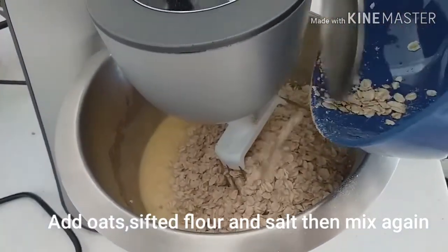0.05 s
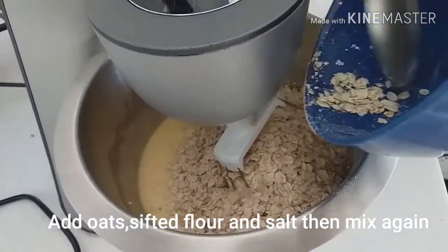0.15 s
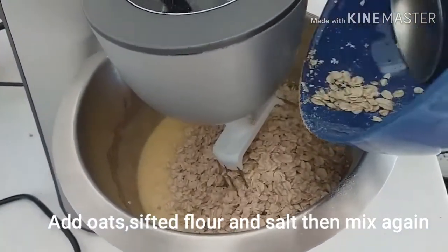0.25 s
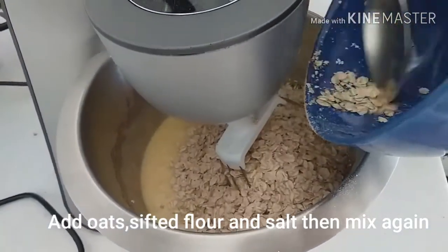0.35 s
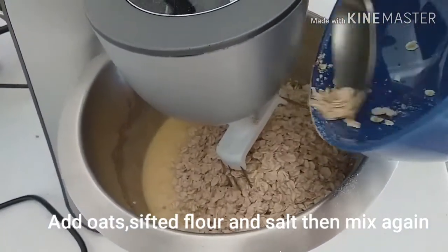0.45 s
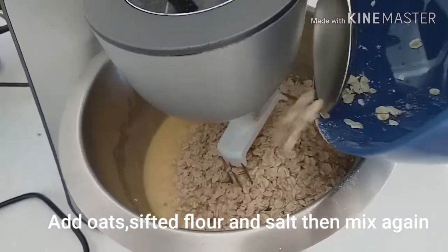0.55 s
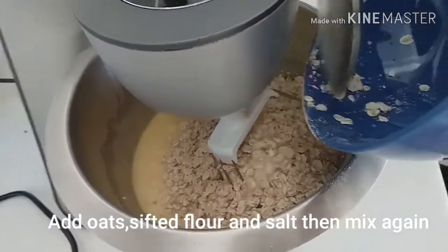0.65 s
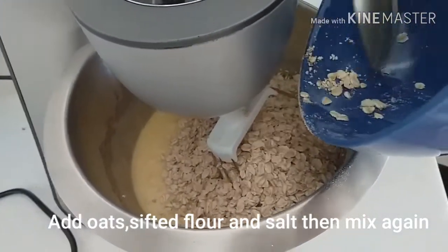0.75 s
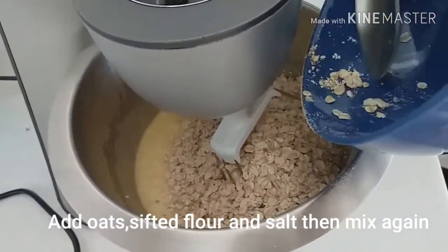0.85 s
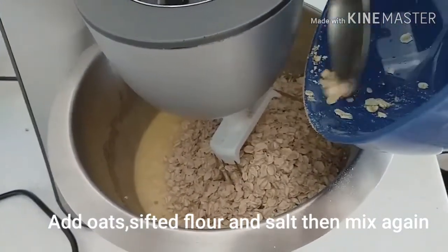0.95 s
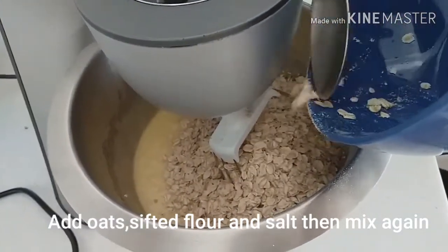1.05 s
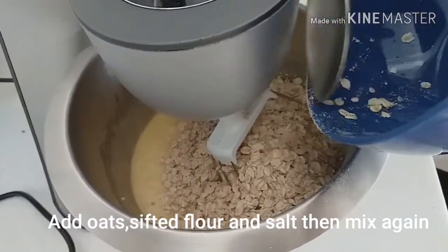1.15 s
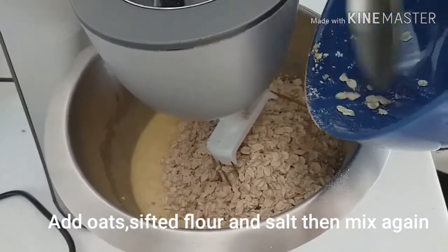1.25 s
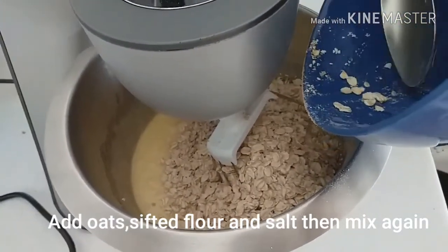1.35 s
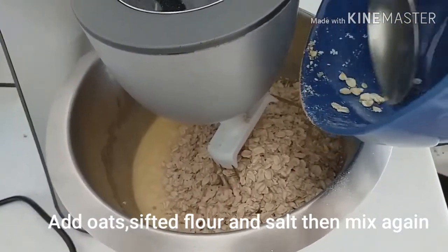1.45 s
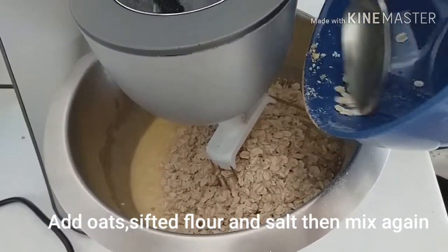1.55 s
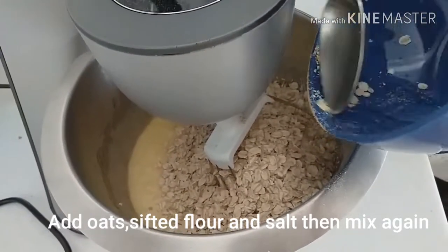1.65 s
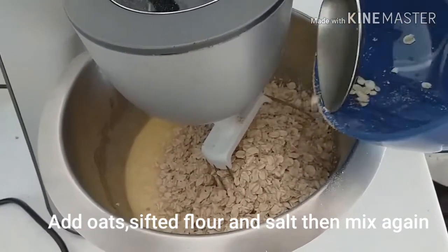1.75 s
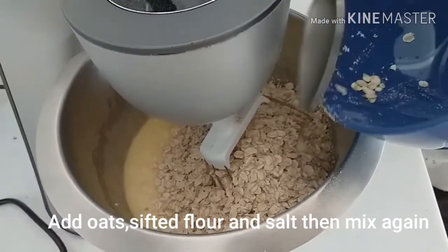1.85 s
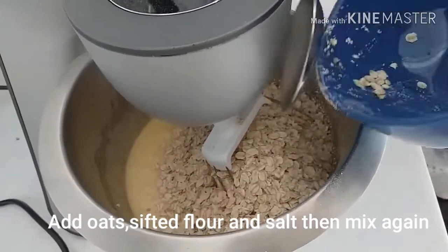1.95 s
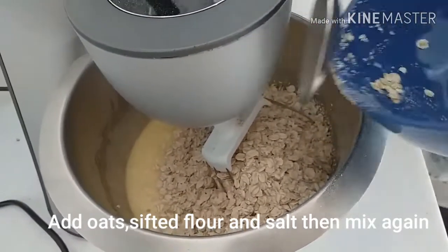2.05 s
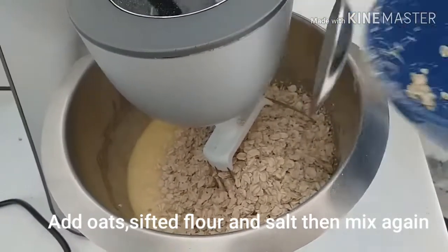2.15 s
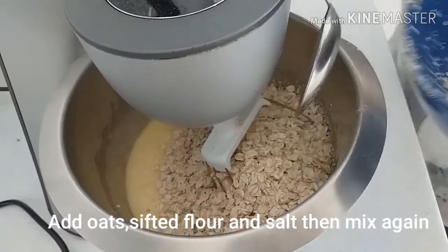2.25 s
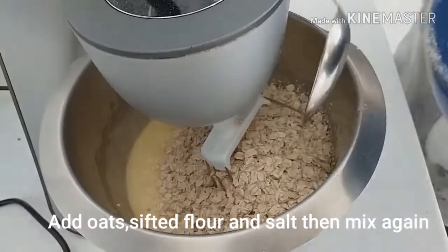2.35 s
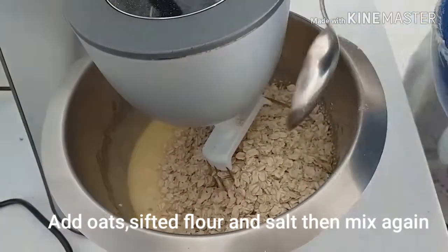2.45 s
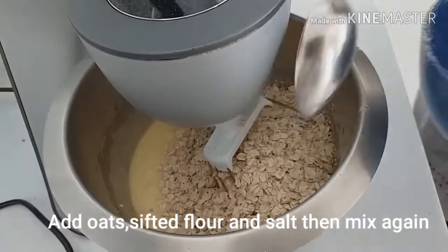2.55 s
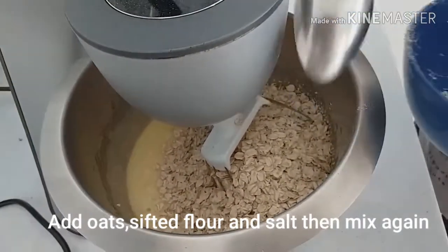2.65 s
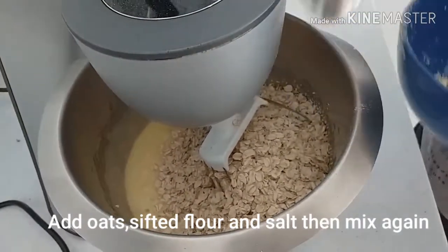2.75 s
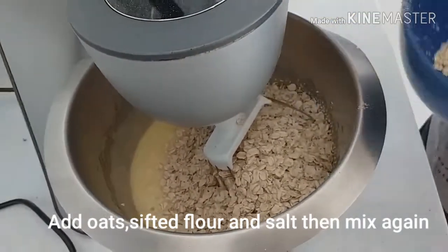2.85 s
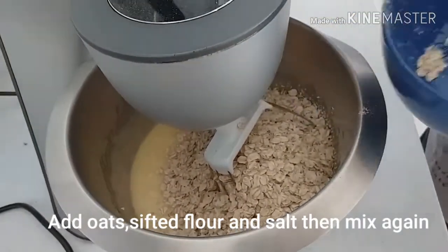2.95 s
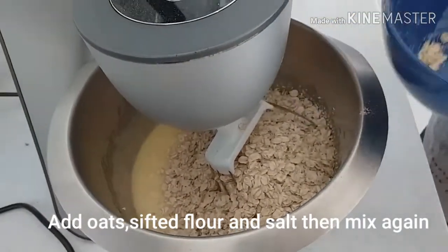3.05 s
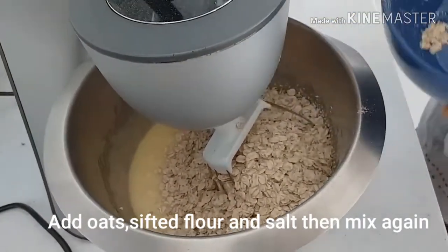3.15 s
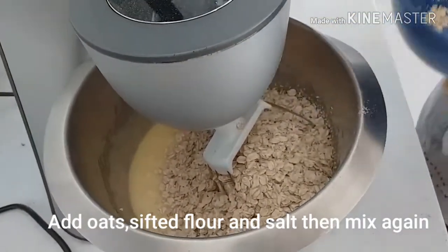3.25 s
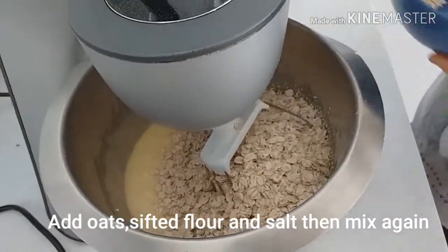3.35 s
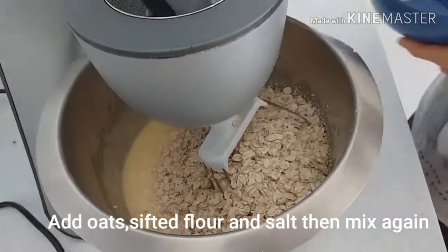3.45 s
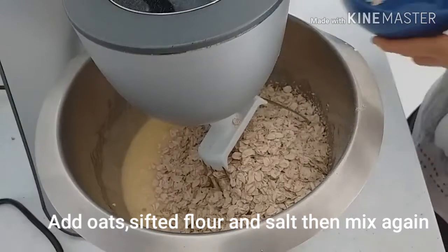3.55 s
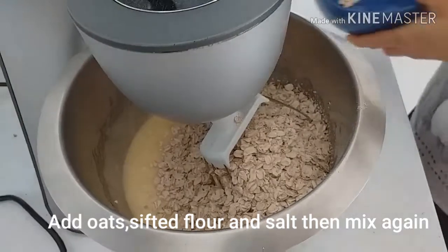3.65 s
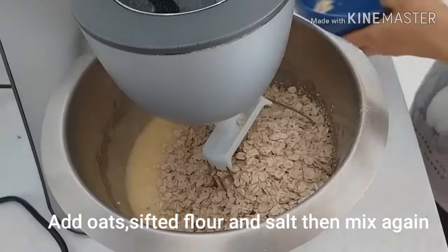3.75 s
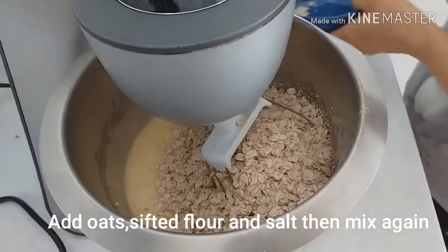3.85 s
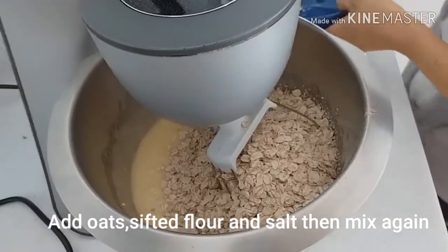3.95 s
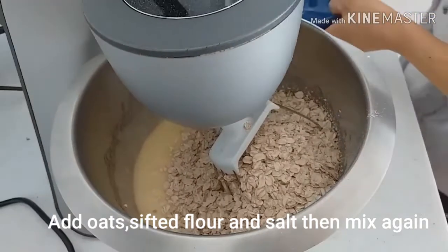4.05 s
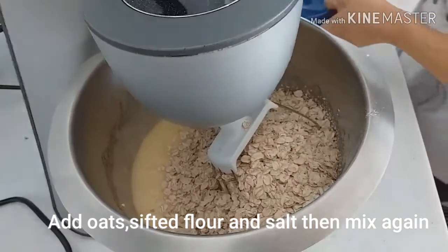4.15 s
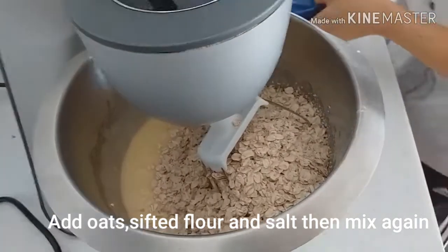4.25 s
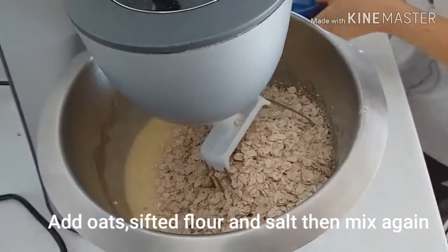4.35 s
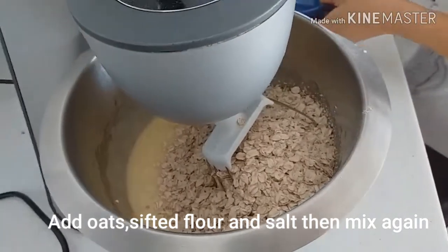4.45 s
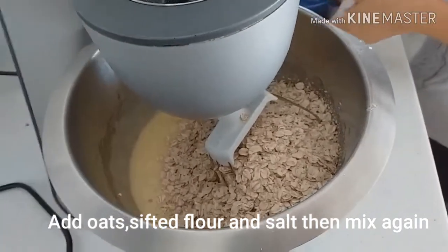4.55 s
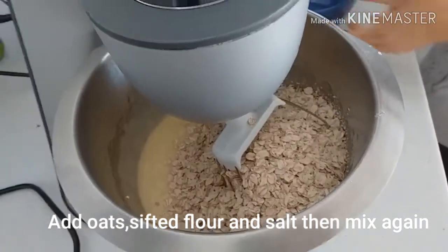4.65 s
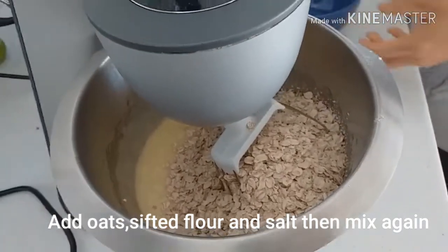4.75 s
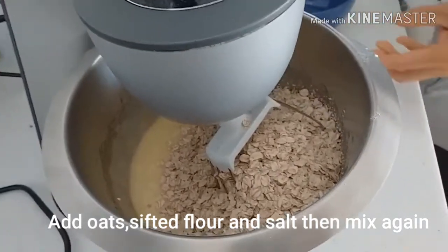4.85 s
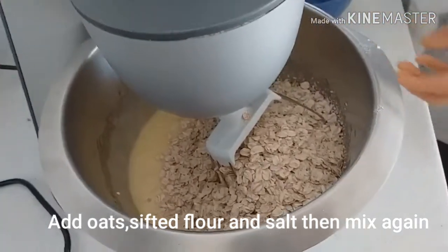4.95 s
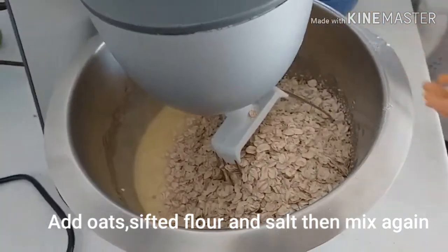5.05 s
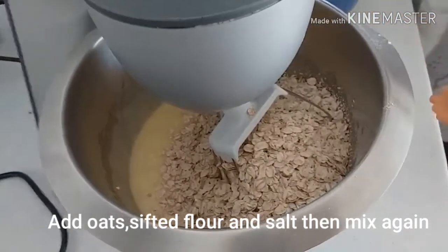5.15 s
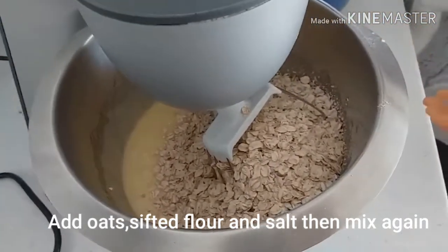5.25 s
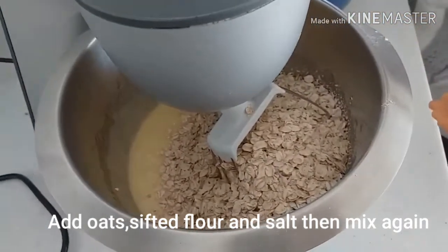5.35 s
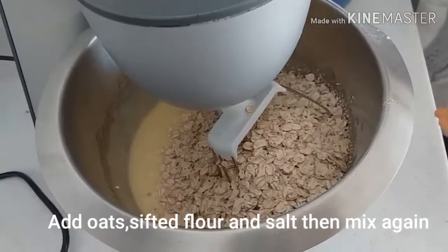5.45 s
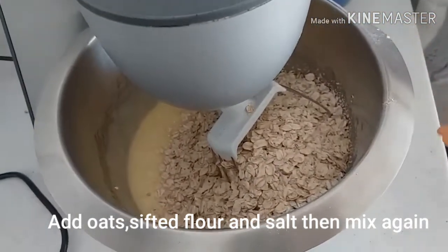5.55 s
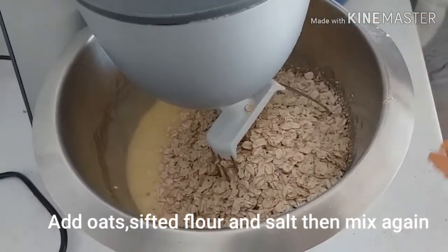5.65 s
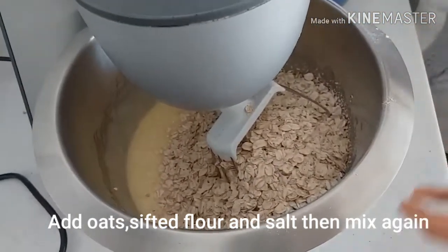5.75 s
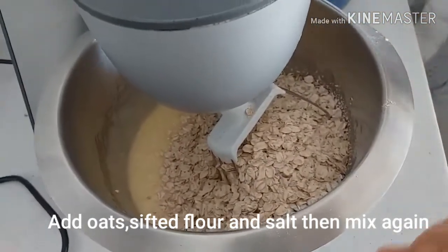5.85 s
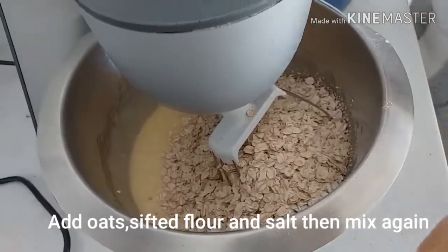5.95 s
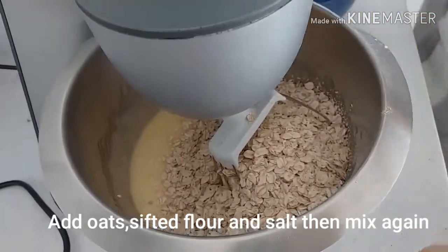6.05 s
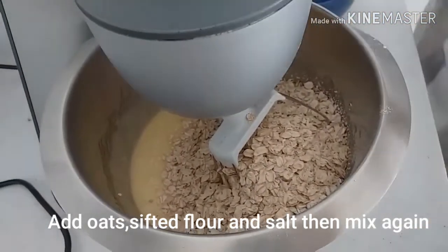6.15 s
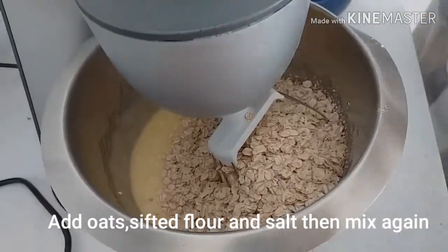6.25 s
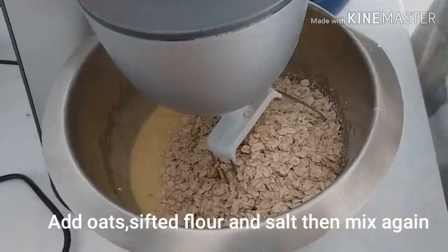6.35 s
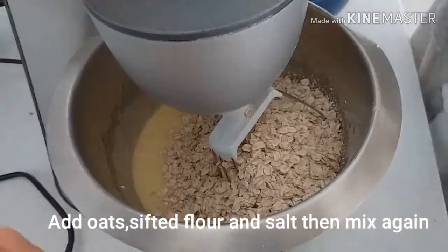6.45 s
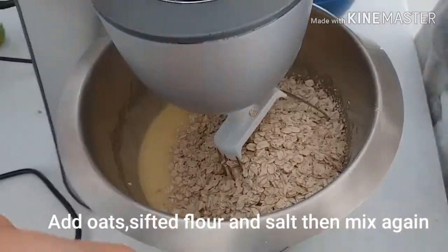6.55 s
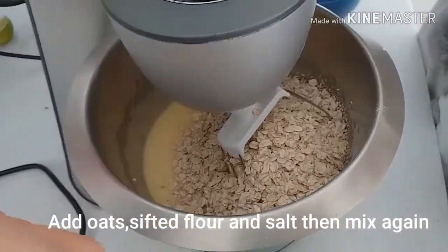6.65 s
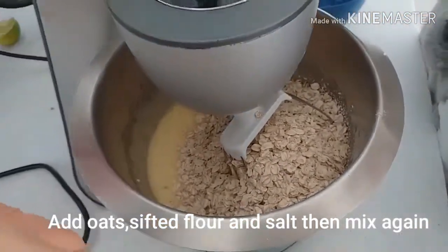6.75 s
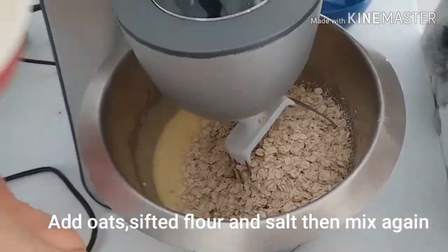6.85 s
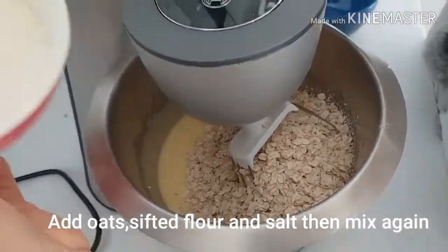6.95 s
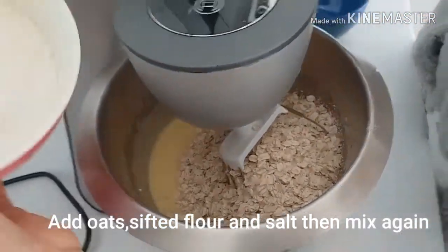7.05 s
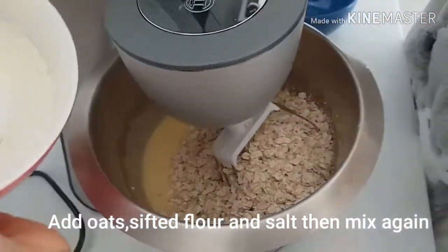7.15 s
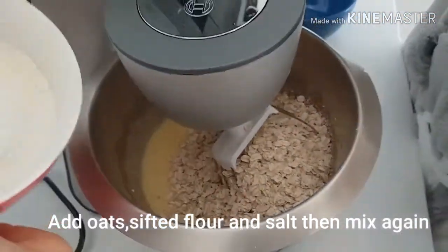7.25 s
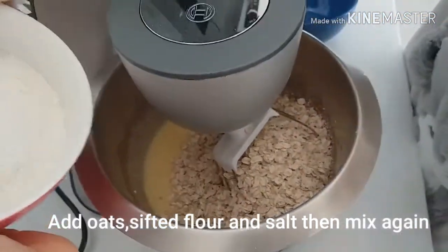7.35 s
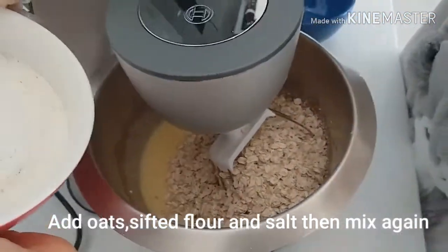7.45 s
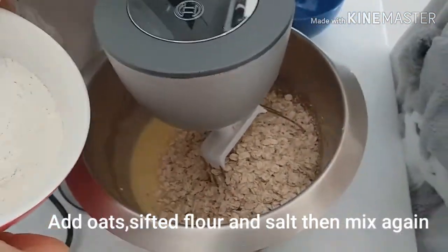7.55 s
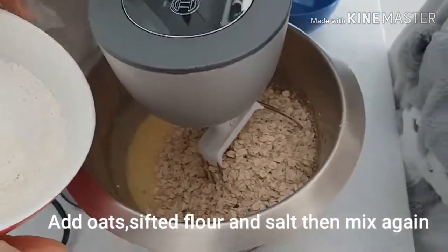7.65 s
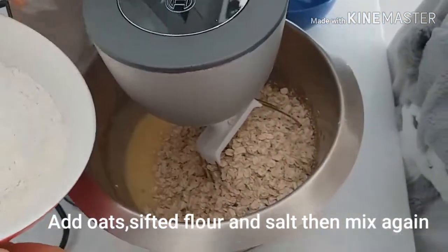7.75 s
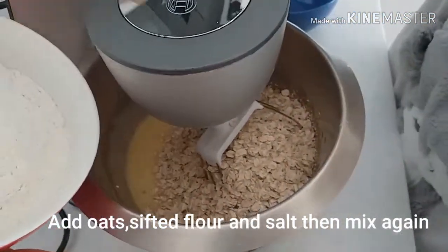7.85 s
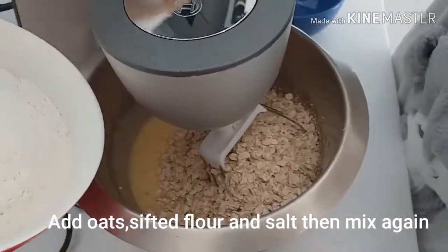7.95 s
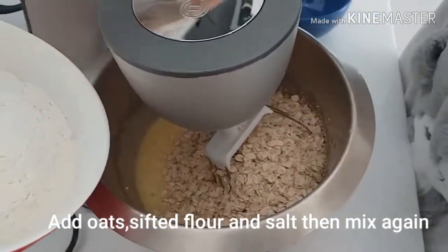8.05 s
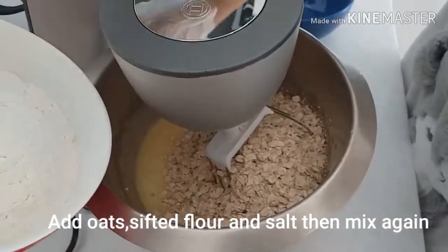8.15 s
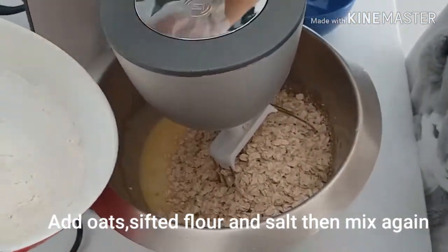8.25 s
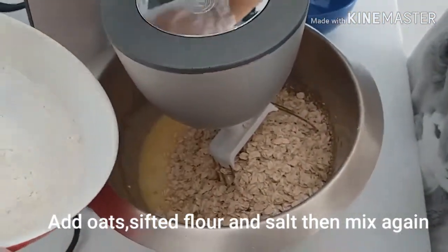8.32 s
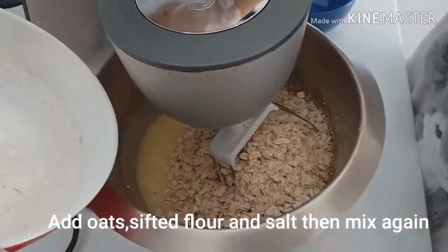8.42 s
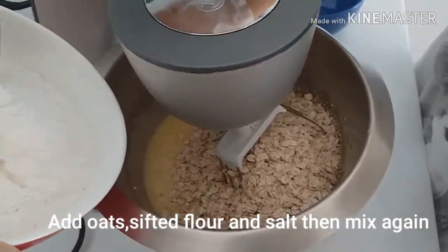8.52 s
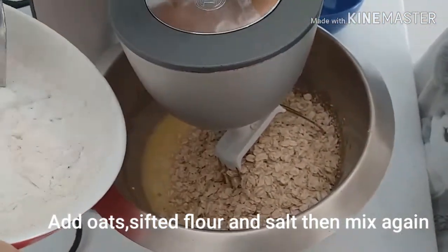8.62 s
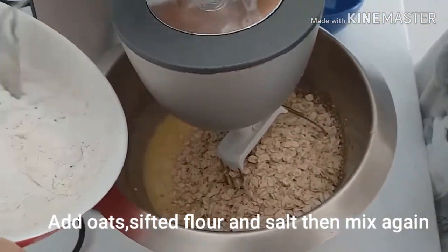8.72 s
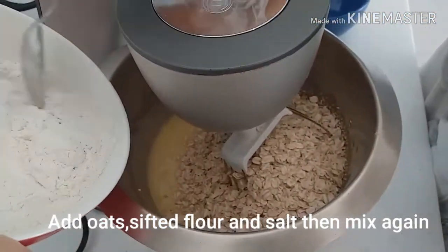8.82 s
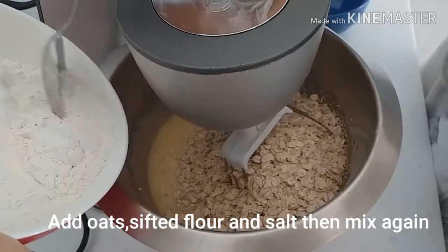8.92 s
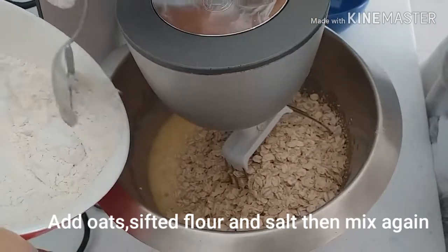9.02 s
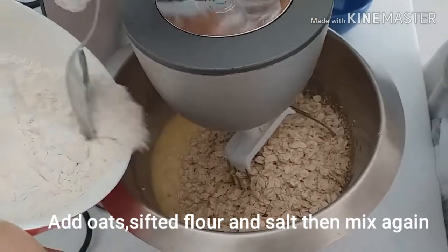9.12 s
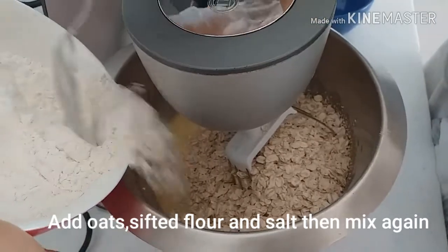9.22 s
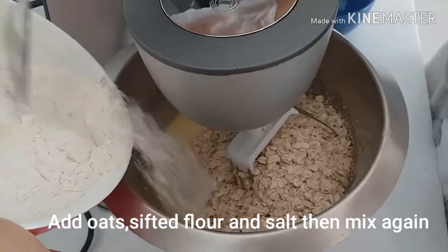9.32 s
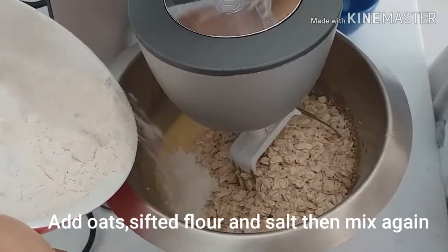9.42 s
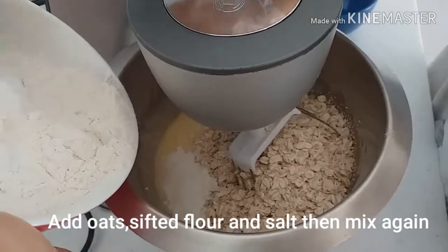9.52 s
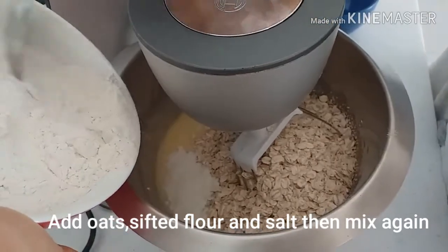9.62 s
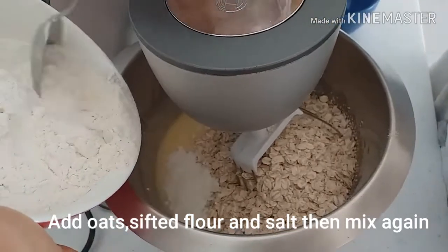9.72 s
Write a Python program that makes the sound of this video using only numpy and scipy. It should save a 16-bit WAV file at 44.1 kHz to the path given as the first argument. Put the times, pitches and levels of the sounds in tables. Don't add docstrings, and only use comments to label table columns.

```python
import sys
import numpy as np
from scipy import signal
from scipy.fft import rfft, irfft, next_fast_len
from scipy.io import wavfile
from scipy.ndimage import uniform_filter1d, map_coordinates

SR = 44100
rng = np.random.default_rng(int(sys.argv[2]) if len(sys.argv) > 2 else 0)


def store_wav(level_fs):
    pcm = np.round(np.clip(np.atleast_2d(level_fs), -1, 1) * 32767)
    wavfile.write(sys.argv[1], SR, pcm.T.astype(np.int16))


def volts_from_db(level):
    exponent = np.asarray(level, float) / 20
    return 10 ** exponent


N = 431298

# start_s, steel_peak_db, brightness_db, steel_hz, freedom_to_ring [ratio]
SPOON_TAPS = [(0.2504, -17.5, -6.5, 1900, 1.1), (0.55, -44.5, -20, 1200, 1.1),
              (0.8059, -42, -4.5, 826, 0.72), (1.0082, -38.5, -12, 3380, 0.56),
              (1.0298, -16, -31.5, 1900, 0.6), (1.438, -34.5, -7, 1880, 0.67), (1.4451, -47, 4, 1880, 0.59),
              (1.668, -33.5, -28, 1200, 0.48), (1.7927, -29.5, -7.5, 1900, 1.2),
              (1.9448, -35, -9, 1180, 0.7), (2.0861, -31, -6.5, 3300, 1.2), (2.7192, -45, -28, 4350, 0.67)]
# freq_hz, level_db, t60_s
STAND_MODES = [(72, -7.5, 0.16), (116.6, 4, 0.11), (192, -1.5, 0.078), (290, 3.5, 0.04)]


def unit(x):
    return x / np.sqrt(np.mean(x ** 2) + 1e-20)


def along(points, hz):
    f, v = np.transpose(points)
    return np.interp(np.log(hz + 1), np.log(f + 1), v)


def wobble(rate_hz):
    knots = rng.standard_normal(int(N * rate_hz / SR) + 4)
    return map_coordinates(knots, [np.arange(N) * rate_hz / SR])


def coloured(x, spectrum):
    m = next_fast_len(N + 8192)
    gain = volts_from_db(along(spectrum, np.fft.rfftfreq(m, 1 / SR)))
    return unit(irfft(rfft(x, m) * gain, m)[:N])


def above(x, hz):
    return signal.sosfilt(signal.butter(3, hz, "high", fs=SR, output="sos"), x)


def patchy(x, depth_db):
    z = signal.stft(x, nperseg=256)[2]
    field = uniform_filter1d(rng.standard_normal(z.shape), 6, 0)
    field = uniform_filter1d(field, 24, 1)
    return signal.istft(z * volts_from_db(depth_db * unit(field)), nperseg=256)[1][:N]


def crackle(density_hz, spread_db, share):
    size = volts_from_db(spread_db * np.minimum(rng.exponential(size=N), 3))
    decay = volts_from_db(-60 * np.arange(SR // 100) / SR / .005)
    creases = signal.fftconvolve((rng.random(N) < density_hz / SR) * size, decay)[:N]
    bursts = unit(creases * volts_from_db(2 * wobble(50)) * rng.standard_normal(N))
    return np.sqrt(share) * bursts + np.sqrt(1 - share) * rng.standard_normal(N)


def swells(rows, shape=1.4):
    t = np.arange(0, N / SR + .002, .002)
    s, db, rise, fall = np.transpose(rows)[:, :, None]
    lost_db = 10 * np.maximum((s - t) / rise, (t - s) / fall) ** shape
    power = volts_from_db(2 * (db - np.minimum(lost_db, 70))).sum(0)
    return np.interp(np.arange(N) / SR, t, 10 * np.log10(power))


def ring(modes, chatter_s, focus_hz=1000, fall_db=0, top_db=0, size=SR // 3):
    hz, db, t60 = np.transpose(modes)[:, :, None]
    t = np.arange(size) / SR
    db = db - fall_db * np.abs(np.log2(hz / focus_hz)) + top_db * (hz > 4000)
    brief = t[:SR // 25]
    contact = rng.standard_normal(len(brief)) * volts_from_db(-60 * brief / chatter_s) * (1 - np.exp(-brief / 0.00022))
    push = np.abs(np.exp(-2j * np.pi * hz * brief) @ contact)[:, None]
    share = push / np.linalg.norm(contact) + .2
    swing = volts_from_db(db - 60 * t / t60) * (1 - np.exp(-t * hz)) * np.sin(2 * np.pi * hz * t)
    x = signal.fftconvolve(contact, (swing / share).sum(0))[:len(t)]
    return x / np.sqrt(6 * uniform_filter1d(x * x, SR // 200).max())


def crack(t60_s):
    return volts_from_db(-60 * np.arange(SR // 3) / SR / t60_s) * rng.standard_normal(SR // 3) / 2


def kitchen():
    # freq_hz, t60_s
    room_t60 = [(100, 0.72), (400, 0.72), (1200, 0.78), (3000, 0.53), (8000, 0.4), (16000, 0.17)]
    hz, t, z = signal.stft(rng.standard_normal(2 * SR // 3), SR, nperseg=256)
    tail = signal.istft(z * volts_from_db(-60 * t / along(room_t60, hz)[:, None]), SR, nperseg=256)[1]
    return np.pad(tail / np.linalg.norm(tail), (round(.005 * SR), 0))


def add(track, start_s, blow, wet_db):
    heard = volts_from_db(wet_db) * signal.fftconvolve(blow, kitchen())
    heard[:len(blow)] += blow
    heard = heard[max(0, -round(start_s * SR)):]
    part = track[max(0, round(start_s * SR)):][:len(heard)]
    part += heard[:len(part)]


def house():
    # time_s, level_db
    air_levels = [(0, -69), (.77, -64), (1.48, -68), (2.15, -63.5), (2.61, -61), (3.3, -67), (4.5, -64.5),
                  (4.98, -57.5), (5.43, -69.5), (6.42, -63.5), (6.7, -68.5), (7.55, -64.5), (7.85, -59.5),
                  (8.7, -67.5), (9.78, -64.5)]
    # freq_hz, level_db_per_hz
    rumble_spectrum = [(12, -70), (20, -35.5), (70, -7), (90, -1.5), (109, 2), (125, -6), (202, -2.5),
                       (305, -4), (394, -10), (694, -17.5), (837, -23.5), (1050, -16.5), (1200, -26),
                       (1560, -30), (2640, -120)]
    # freq_hz, level_db_per_hz
    hiss_spectrum = [(350, -42), (600, -29), (1070, 5), (1730, -3), (2570, -15.5), (4980, -4.5), (8160, -6),
                     (9240, -10.5), (14900, -9), (16000, 0)]
    s, db = np.transpose(air_levels)
    level_db = np.interp(np.arange(N) / SR, s, db) + 2.5 + 0.4 * wobble(2.8)
    rumble = volts_from_db(level_db) * coloured(rng.standard_normal(N), rumble_spectrum)
    return rumble + volts_from_db(-74) * coloured(rng.standard_normal(N), hiss_spectrum)


def slides():
    # peak_s, level_db, rise_s, fall_s, pitch_hz
    strokes = [(1.47, -60, 0.076, 0.061, 720), (1.6, -64, 0.053, 0.063, 1000),
               (1.72, -59, 0.034, 0.045, 570), (3.78, -54, 0.07, .12, 12700), (3.95, -49, 0.13, .12, 13200),
               (4.12, -46, 0.1, 0.14, 13900), (5.0, -51, 0.065, 0.078, 338), (6.3, -70.5, 0.25, 0.26, 1620),
               (6.33, -61.5, 0.086, 0.24, 4760), (6.84, -69.5, 0.11, 0.2, 710),
               (7.15, -61, 0.096, 0.061, 288)]
    out = np.zeros(N)
    grit = crackle(density_hz=480, spread_db=3.0, share=.3)
    for *stroke, hz in strokes:
        near = slice(round((stroke[0] - .5) * SR), round((stroke[0] + .5) * SR))
        off_hz = min(hz * 0.22, 901)
        band = signal.butter(2, [hz - off_hz, hz + off_hz], "band", fs=SR, output="sos")
        out[near] += volts_from_db(swells([stroke])[near]) * unit(signal.sosfilt(band, grit[near]))
    return out


def thumps():
    # start_s, peak_db, rattle_db
    mixer_knocks = [(4.601, -37, -20), (7.763, -31.5, -2), (8.89, -36.5, -5), (9.118, -43.5, -8.5),
                    (9.531, -35, 3)]
    # freq_hz, level_db, t60_s
    mixer_modes = [(600, -3, 0.044), (1140, -10, 0.076), (1310, -3.5, .06), (1500, -11, 0.067),
                   (1900, -5, 0.17), (2700, 2, 0.027), (3650, 5, 0.022), (5000, -5, 0.0302)]
    out = np.zeros(N)
    for s, db, rattle_db in mixer_knocks:
        blow = ring(STAND_MODES, chatter_s=0.016) + volts_from_db(rattle_db) * ring(mixer_modes, chatter_s=0.0072)
        add(out, s, volts_from_db(db) * blow, wet_db=-7.5)
    return out


def clinks():
    # start_s, peak_db, chatter_s, click_db, room_db
    hits = [
        (4.599, -11.5, 0.029, -11.5, -6),
        (4.9446, -15, 0.013, -44, -6),
        (7.598, -21.5, 0.014, -5, -9.5),
        (8.885, -25, 0.043, -16, -17),
        (9.5227, -20, 0.0051, -8, -10),
    ]
    # freq_hz, level_db, t60_s
    cup_and_saucer = [(1164, -9.5, 0.064), (1378, -5, 0.041), (1304, -3.5, 0.029), (2320, -17, 0.047),
                      (2643, -41, 0.38), (2636, -24, 0.72), (2310, -25, 0.27), (3120, -32, .04), (3700, -6, 0.042),
                      (4110, -18, 0.0497), (720, -12.5, 0.029),
                      (4430, -6, .07), (4640, 3, .04), (4790, 2, .04), (4710, -3, .22), (4900, -5, .08),
              (5152, -5, .09), (5300, -7, .06), (5453, -4, .07), (5981, -4, .09), (7240, -14, .05),
              (8500, -1, .017), (9720, -9, .05), (10130, 3, .045), (11300, -7.5, .039)]
    glass = [(540, 4, .012), (680, -6.5, .014), (1140, -8.5, .035), (1560, -2, .03), (2060, -13, .038),
             (3435, 3, .07), (3576, 4.5, .07), (3521, -15, .3), (3470, -13, .15), (4700, -10, .025),
             (5970, -11, .07)]
    dish = [(1290, -7, 0.0087), (1700, 0, 0.0077), (2750, -21, 0.04), (3530, -0.5, 0.0072),
            (4580, -14, 0.025), (5250, -8, 0.023), (6600, -13, 0.012), (8000, -17, 0.023),
            (9580, -17, 0.059)]
    rim = [(1900, -28, 0.012), (3760, 2, 0.014), (4676, 0.5, 0.023), (5460, 6, 0.011), (5970, 7, 0.0063),
           (7220, 4, 0.0062), (8500, -2, 0.0059), (10500, -4, .01)]
    basin = [(1098, -8, .6), (1140, -11, .5), (1172, -2, .07), (577, -10, .03), (1500, -8, .12),
             (2300, 1, .012), (2649, -13, .5), (2590, -6, .04), (3520, -3, .01), (4020, -3, .014),
             (4662, -9, .4), (4715, -6, .1), (5370, -4, .03), (5950, -2, .04)]
    bounce_s, bounce_db = 0.011, -18.5
    out = np.zeros(N)
    for (s, db, chatter_s, click_db, wet_db), modes in zip(hits, [cup_and_saucer, glass, dish, rim, basin]):
        blow = ring(modes, chatter_s) + volts_from_db(click_db) * crack(0.017)
        again = ring(modes, chatter_s) + volts_from_db(click_db) * crack(0.02)
        again = np.pad(again, (round(bounce_s * SR), 0))[:len(blow)]
        add(out, s, volts_from_db(db) * (blow + volts_from_db(bounce_db) * again), wet_db)
    return out


def set_down():
    # start_s, peak_db, thud_db, contact_s, rattle_db
    bangs = [
        (4.062, -9, -17, 0.0084, -0.5),
        (4.253, -31.5, -21, 0.0074, -23),
        (4.2855, -32, -3.5, 0.014, -15),
        (4.296, -29.5, -6, 0.0063, -18),
    ]
    # freq_hz, level_db, t60_s
    counter_modes = [(235, -26, 0.16), (402, -16, 0.069), (643, -18, 0.0083), (760, -12.5, 0.0046),
                     (1000, 1.5, 0.0073), (1187, -1, 0.012), (1330, -1, 0.0076), (1570, 2, 0.01),
                     (1695, -0.5, 0.0097), (1900, -8.5, 0.011), (2190, -18.5, 0.0036), (2653, -7.5, .009),
                     (3037, -11, 0.015), (4190, -19, 0.012)]
    # freq_hz, level_db_per_hz
    rattle_spectrum = [(90, -29.5), (170, -4.5), (370, 0.5), (560, -4.5), (1030, -4), (1600, -6.5),
                       (2300, -15), (6000, -24.5)]
    lowpass = signal.butter(4, 1704, fs=SR, output="sos")
    out, pushes = np.zeros(N), np.zeros(N)
    for s, db, thud_db, contact_s, rattle_db in bangs:
        slap = above(ring(counter_modes, chatter_s=contact_s), hz=250.7) + .02 * crack(0.023)
        clatter = above(signal.sosfilt(lowpass, 4 * crack(0.004)), hz=490.0)
        thud = volts_from_db(thud_db) * ring(STAND_MODES, chatter_s=0.018)
        blow = 2.0 * slap + volts_from_db(-7.5) * clatter + thud
        add(out, s, volts_from_db(db + 1.0) * blow, wet_db=-13.5)
        pushes[round(s * SR)] = volts_from_db(rattle_db)
    rattle = signal.fftconvolve(pushes, kitchen())[:N]
    return out + volts_from_db(-47.5) * coloured(rattle, rattle_spectrum)


def ticks():
    # start_s, peak_db
    crease_ticks = [(2.343, -42), (2.4404, -32), (2.5554, -34), (2.6484, -24), (2.8087, -33), (2.8449, -29),
                    (2.9013, -32), (2.9287, -40), (3.02, -27), (3.0673, -30), (3.1378, -23), (3.2016, -25),
                    (3.236, -32), (3.2504, -30), (3.2929, -34), (3.4017, -33), (3.5084, -33), (3.5214, -29),
                    (3.6047, -30), (3.632, -32), (3.683, -26), (3.8594, -40), (7.205, -44), (7.238, -38),
                    (7.5064, -38), (7.5218, -33), (7.8276, -35), (7.856, -36), (7.8735, -37), (8.2072, -30),
                    (8.53, -39), (8.5649, -35), (8.839, -43), (9.7064, -37)]
    out = np.zeros(N + SR)
    for s, db in crease_ticks:
        out[round(s * SR):][:SR // 50] += volts_from_db(db) * crack(.005)[:SR // 50]
    return above(out[:N], hz=2400)


def clear_snaps():
    # start_s, peak_db, pitch_hz
    short_snaps = [(2.183, -42, 8000), (2.219, -40, 5000), (2.27, -30, 6600), (2.3565, -35.5, 4570),
                   (2.394, -32, 11100), (2.409, -34, 8510), (2.4407, -34, 6960), (2.595, -26, 3620),
                   (3.139, -39, 4460), (3.314, -32, 3370), (3.4176, -37.5, 3700), (3.6047, -40, 8300),
                   (3.632, -38, 4200), (3.899, -25.5, 5200), (5.666, -48.5, 4830), (6.425, -51, 4280),
                   (6.5044, -42, 7900), (6.8782, -36.5, 11760), (6.9442, -41, 14300), (7.0562, -41, 4570),
                   (7.0737, -33, 12600), (7.2688, -39, 7540), (7.328, -40, 4220), (8.5655, -53, 6100),
                   (8.628, -37.5, 5370), (9.023, -42, 8500), (9.093, -46, 5030), (9.241, -45, 7620),
                   (9.288, -48.5, 13850), (9.617, -45, 4650),
                   (0.535, -45.5, 7000), (.562, -55, 5000), (.582, -48, 5860), (0.639, -43, 5150),
              (1.7742, -50, 12000), (1.864, -52, 13000), (1.907, -54, 13500), (1.9662, -41, 14100),
              (2.049, -49, 12000), (2.061, -49, 8000), (2.074, -40, 8500), (2.191, -36.5, 7000),
              (2.207, -42, 13600), (2.2576, -45, 11100), (2.36, -33, 4900), (2.4345, -46, 5680),
              (2.491, -39, 7900), (2.752, -40, 10700), (2.822, -37, 12400), (3.25, -39, 12000),
              (3.441, -39, 5950), (3.465, -51, 10920), (3.525, -43, 9100), (3.59, -39, 12000),
              (3.637, -42, 12500)]
    size = SR // 25
    snaps = np.zeros(N + SR)
    for s, db, hz in short_snaps:
        modes = [(hz, 0, .003), (4300, -7, .003), (8000, -6, .0015), (13000, -4, .0012)]
        burst = ring(modes, chatter_s=.007, focus_hz=hz, fall_db=2.5, size=size)
        snaps[round(s * SR):][:size] += volts_from_db(db - 2) * burst
    snaps = above(snaps[:N], hz=2217)
    return snaps + volts_from_db(-11.0) * signal.fftconvolve(snaps, kitchen())[:N]


def rustle():
    # peak_s, level_db, rise_s, fall_s
    sweeps = [(.076, -61, 0.063, 0.08), (.42, -65.5, 0.15, 0.072), (.648, -60.5, 0.097, 0.071),
              (.99, -68, 0.34, 0.15), (1.156, -66.5, 0.028, 0.18), (1.668, -67.5, 0.23, 0.18),
              (1.85, -69, 0.088, 0.16), (1.99, -64, 0.11, 0.027), (2.07, -61, 0.038, 0.063),
              (2.2, -58, 0.033, 0.12)]
    # peak_s, level_db, rise_s, fall_s
    squeezes = [(2.36, -41.5, 0.0059, 0.011), (2.44, -49.5, 0.069, 0.027), (2.51, -44.5, 0.063, .1),
                (2.6, -45, 0.056, .07), (2.675, -43.5, 0.089, 0.11), (2.84, -49.5, 0.099, 0.13),
                (2.97, -46, 0.046, 0.13), (3.05, -50.5, 0.08, 0.063), (3.145, -51, 0.016, 0.083),
                (3.23, -50, 0.089, 0.13), (3.39, -50, 0.11, 0.098), (3.52, -51, 0.052, 0.1),
                (3.62, -66, 0.06, .05), (3.722, -45.5, 0.059, 0.22), (4.05, -43, 0.29, 0.29),
                (4.174, -45, 0.022, 0.046), (4.59, -50.5, 0.17, 0.39), (4.9, -82, .2, 0.13),
                (5.44, -67.5, 0.12, 0.21), (5.75, -66.5, 0.16, 0.83), (6.349, -63.5, 0.14, 0.68),
                (6.779, -75, 0.079, 0.09), (7.08, -53.5, 0.075, 0.74), (7.62, -46, 0.07, 0.31),
                (7.979, -42, 0.092, 0.17), (8.222, -40.5, 0.047, 0.15), (8.601, -53, 0.84, 0.32),
                (8.871, -54.5, 0.013, 0.15), (9.128, -62.5, 0.075, 0.21), (9.42, -61, 0.13, 0.22),
                (9.74, -52.5, 0.15, 0.58)]
    # peak_s, level_db, rise_s, fall_s
    rubs = [(.03, -62.5, 0.12, 0.059), (.99, -59, 0.033, 0.1), (1.62, -94, 0.035, 0.13),
            (2.41, -65.5, 0.13, 0.14), (5.08, -63.5, 0.14, 0.12), (6.25, -73, 0.18, 0.1),
            (7.8, -59, 0.078, 0.25)]
    # freq_hz, level_db_per_hz
    crisp_spectrum = [(1530, -80), (2600, -8), (3280, 0), (4330, 7), (4750, 7.5), (6160, 5), (6860, 3),
                      (7940, 7), (9150, -3.5), (9500, -2.5), (12400, -84), (20900, -120)]
    near_spectrum = [(1530, -52), (2600, -20), (2850, -11), (3350, 2.5), (3820, 1), (4500, 5), (5150, 1.5),
                     (6020, -0.5), (8160, 2.5), (9500, -7.5), (12400, -27.5), (20900, -120)]
    body_spectrum = [(290, -16.5), (500, -13), (888, -13), (1200, -10), (1720, -7.5), (2610, -5),
                     (3200, -17), (4160, -20.5), (7040, -120)]
    fizz_spectrum = [(5000, -58), (8500, -16.5), (9150, -21), (9940, 11), (14700, 16.5), (15500, 13.5),
                     (16000, -28.5)]
    middle_db = -55
    crisp_db = swells(sweeps + squeezes)
    body_db = middle_db - 11 + 1.015 * (crisp_db - middle_db)
    fizz_db = middle_db - 2.5 + 1.05 * (crisp_db - middle_db)
    film = patchy(crackle(density_hz=1100, spread_db=2.3, share=.4), depth_db=1.7)
    film = film * volts_from_db(1.8 * (wobble(70) + wobble(35)))
    film = film / np.sqrt(np.abs(uniform_filter1d(film ** 2, round(.07 * SR))) + 1e-9)
    is_near = np.arange(N) < 5.3 * SR
    crisp = np.where(is_near, coloured(film, near_spectrum), coloured(film, crisp_spectrum))
    out = volts_from_db(crisp_db) * crisp + volts_from_db(fizz_db) * coloured(film, fizz_spectrum)
    out += (volts_from_db(body_db) + volts_from_db(swells(rubs))) * coloured(film, body_spectrum)
    return out + clear_snaps()


def afterthoughts():
    # freq_hz, level_db, t60_s
    shimmer_modes = [(2190, 2, 0.06), (3070, -1.5, 0.1), (3640, -9, 0.11), (4130, -2, 0.086),
                     (4800, -14, 0.11), (5534, 4, 0.081), (6200, -5, .12), (6901, -9, .1), (7400, -11, .08),
                     (7600, -3, .08)]
    # start_s, peak_db, freq_hz, t60_s
    nudges = [(.289, -42, 6300, .01), (.5515, -48, 1500, .02), (2.3, -50, 1300, .01),
              (2.408, -46, 1500, .008), (2.439, -41, 1900, .012), (4.0655, -9.5, 1080, .012),
              (4.253, -26, 1000, .014), (4.286, -29, 500, .03), (5.058, -50, 5600, .006),
              (5.666, -53, 700, .01), (7.612, -35, 1350, .015), (9.533, -29, 2550, .012),
              (9.707, -42, 2500, .012)]
    out = np.zeros(N)
    add(out, SPOON_TAPS[0][0], volts_from_db(-34) * ring(shimmer_modes, chatter_s=0.011), wet_db=-1.5)
    size = SR // 25
    for s, db, hz, t60 in nudges:
        modes = [(hz, 0, t60), (1.5 * hz, -8, t60 / 2)]
        out[round(s * SR):][:size] += volts_from_db(db) * ring(modes, chatter_s=.004, size=size)
    return out


def spoon_scrape():
    # peak_s, level_db, rise_s, fall_s
    strokes = [
        (.4, -56, 0.13, 0.084),
        (.95, -52.5, 0.077, 0.097),
        (1.56, -54.5, 0.057, 0.14),
        (1.64, -58.5, 0.069, 0.074),
    ]
    # freq_hz, level_db, t60_s
    edge_modes = [(834, -3.5, 0.036), (1850, -1.5, 0.062), (1884, -4.5, 0.054), (3295, -11, 0.052),
                  (4910, -11, .025), (5660, -21, 0.022), (6930, -22, 0.024)]
    lift_s, lift_ratio, lift_db = 0.052, 1.035, -5.5
    drag = volts_from_db(swells(strokes, shape=2))
    late = volts_from_db(lift_db + swells(np.add(strokes, [lift_s, 0, 0, 0]), shape=0.74))
    slips = crackle(density_hz=1000, spread_db=9.0, share=0.57)
    out = np.zeros(N)
    for level, pitch in [(drag, 1), (late, lift_ratio)]:
        edge = ring(np.multiply(edge_modes, [pitch, 1, 1]), chatter_s=0.0069)
        out += level * unit(signal.fftconvolve(slips, edge)[:N])
    return volts_from_db(-0.5) * out


def spoon_on_bowl():
    # freq_hz, level_db, t60_s
    spoon_modes = [(826, -13, 0.44), (1157, 9, 0.0096), (1900, -2, 0.075), (2440, -8.5, 0.018),
                   (3075, -24, 0.12), (3260, 16.5, 0.0018), (4600, -14, 0.04), (5100, 13, 0.012),
                   (5260, -5.5, 0.071), (6300, -1, 0.016), (6860, 16.5, 0.016), (8100, 9, 0.024),
                   (9700, -11, 0.038), (3300, -5.5, 0.036)]
    # freq_hz, level_db, t60_s
    bowl_modes = [(320, 28.5, 0.0089), (436, 26, 0.014), (542, 22.5, 0.047), (643, -5.5, 0.38),
                  (826, 28, 0.01), (1147, 12, 0.057), (1200, 9, 0.026)]
    # peak_db, focus_hz
    bowl_knocks = [(-31.5, 890), (-39.5, 593), (-47.5, 770), (-39, 270), (-35.5, 650), (-41.5, 293),
                   (-46.5, 830), (-31, 285), (-79, 1200), (-45, 390), (-43.5, 770), (-45, 710)]
    # freq_hz, level_db, t60_s
    pan_modes = [(1500, -2, .035), (1545, -3, .035), (830, -3, .03)]
    room_share = 0.24
    size = SR // 4
    out, wash = np.zeros(N), np.zeros(N)
    add(out, -.06, volts_from_db(-35.5) * ring(bowl_modes, chatter_s=0.0091, focus_hz=616, fall_db=-3.0), wet_db=0.5)
    for (s, steel_db, bright_db, steel_hz, free), (knock_db, knock_hz) in zip(SPOON_TAPS, bowl_knocks):
        steel = ring(np.multiply(spoon_modes, [1, 1, free]), chatter_s=0.033, size=size,
                     focus_hz=steel_hz, fall_db=8.5, top_db=bright_db + 4)
        steel += volts_from_db(bright_db + 4.5) * above(crack(0.035), hz=2500)[:size]
        steel = volts_from_db(steel_db - 5.0) * above(steel, hz=665)
        knock = ring(bowl_modes, chatter_s=0.0061, focus_hz=knock_hz, fall_db=22, size=size)
        out[round(s * SR):][:len(steel)] += (1 - room_share) * steel
        add(out, s, room_share * steel + volts_from_db(knock_db + 8.0) * knock, wet_db=-10.5)
        wash[round(s * SR)] = volts_from_db(steel_db + bright_db + 10)
    out += above(signal.fftconvolve(wash, kitchen())[:N], hz=1680)
    add(out, 1.672, volts_from_db(-48.5) * ring(pan_modes, chatter_s=0.0085), wet_db=4)
    return out + spoon_scrape()


def scene():
    knocks = above(set_down() + thumps(), hz=55) + above(clinks(), hz=388) + above(spoon_on_bowl(), hz=200)
    return (house() + slides() + ticks() + rustle() + afterthoughts() + knocks)[None]


def roll_off(x):
    return signal.sosfilt(signal.butter(12, 16820, fs=SR, output="sos"), x)


def record(dry):
    top = .56
    limited = dry / (1 + np.abs(dry / top) ** 4) ** .25
    mix = signal.sosfilt(signal.ellip(10, .5, 60, 15700, fs=SR, output="sos"), limited)
    return roll_off(mix)


dry = scene()
out = record(dry)
store_wav(out)
```